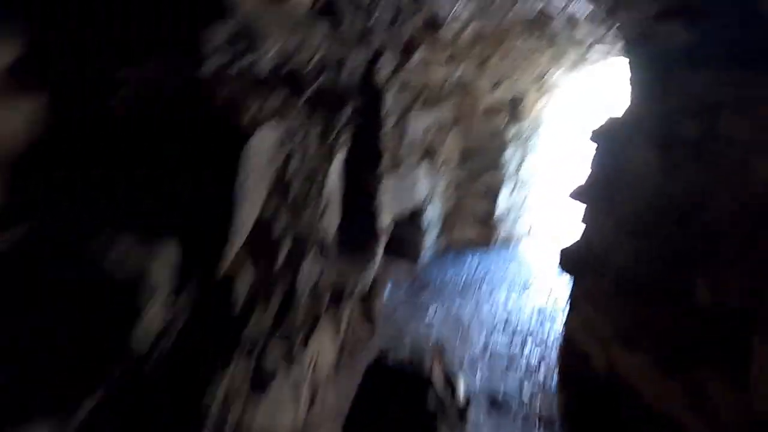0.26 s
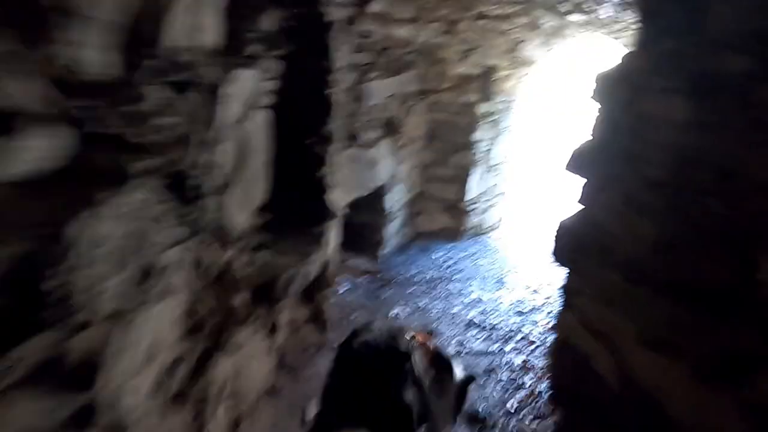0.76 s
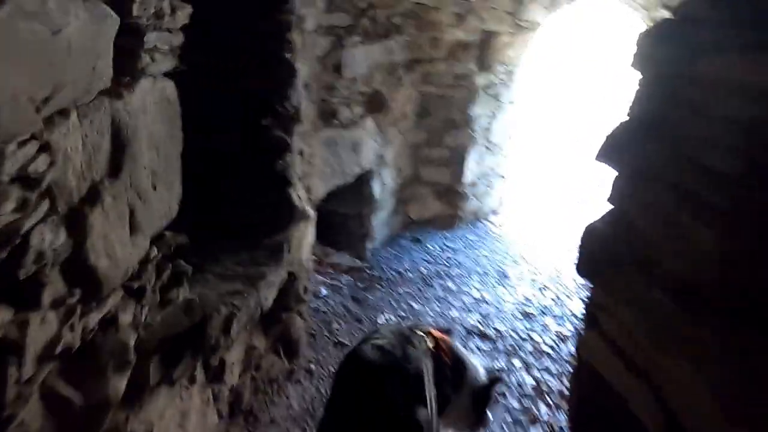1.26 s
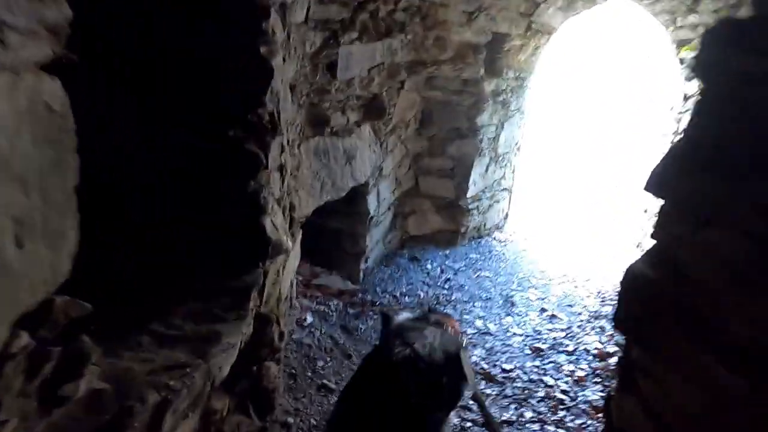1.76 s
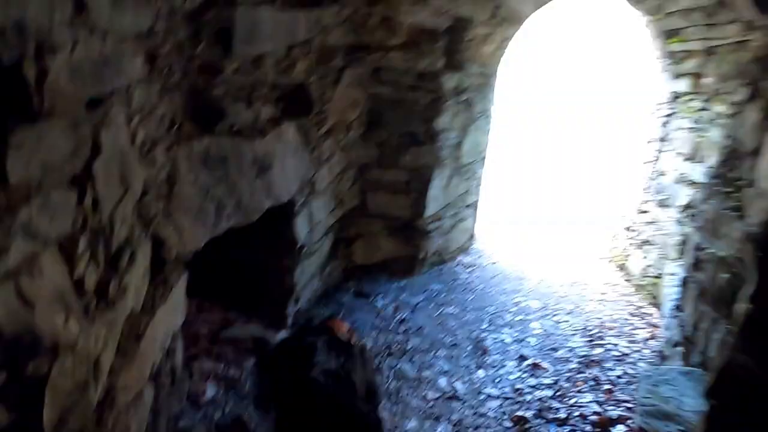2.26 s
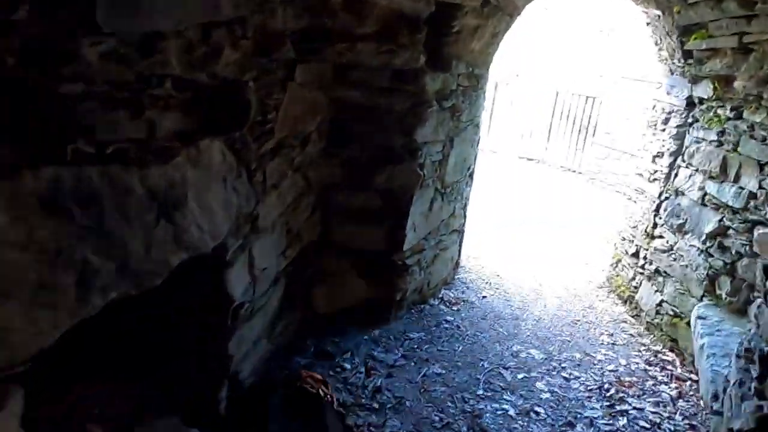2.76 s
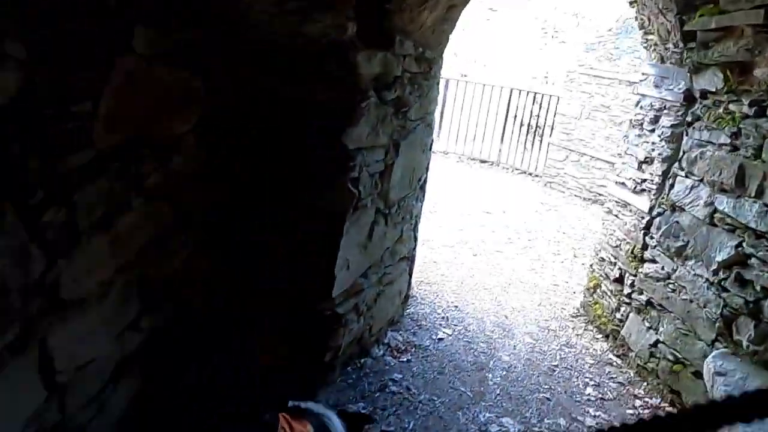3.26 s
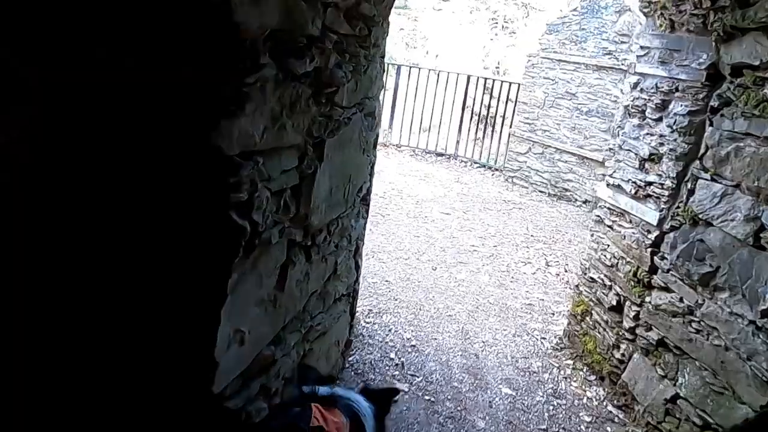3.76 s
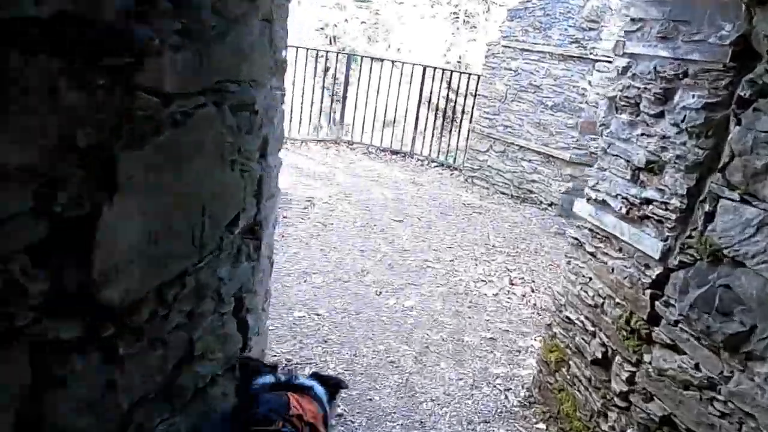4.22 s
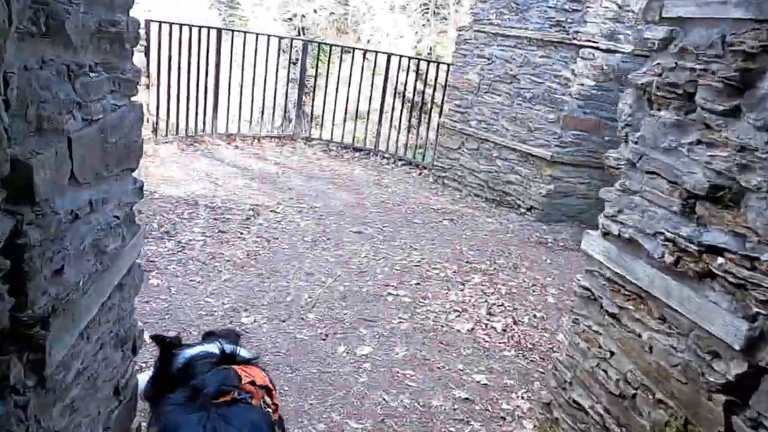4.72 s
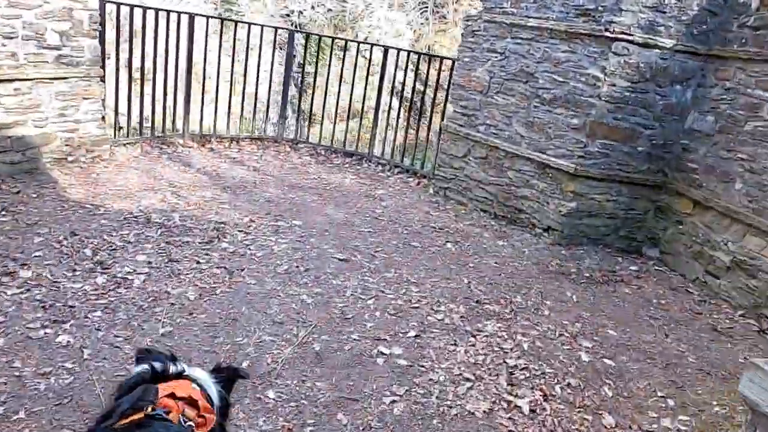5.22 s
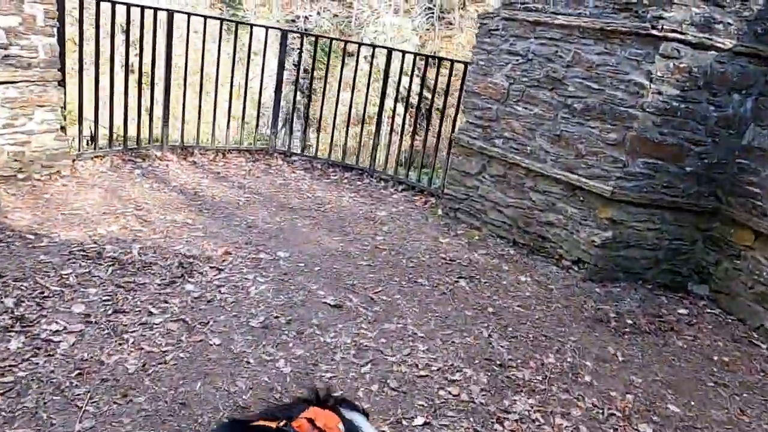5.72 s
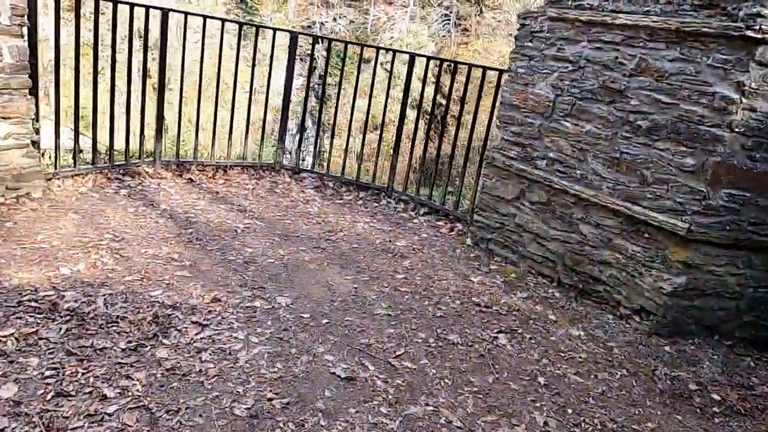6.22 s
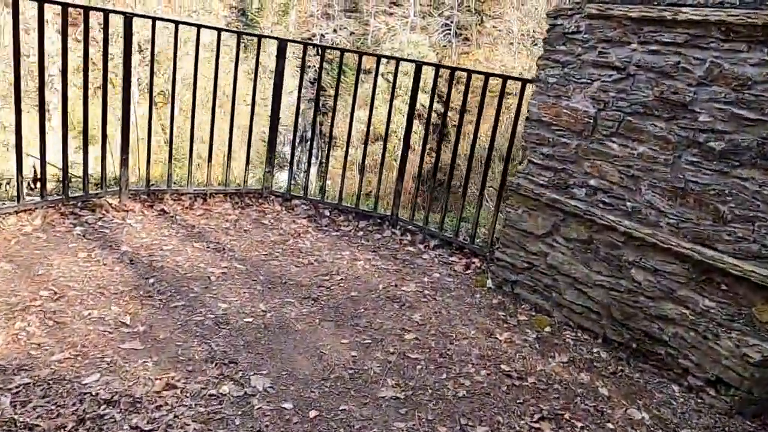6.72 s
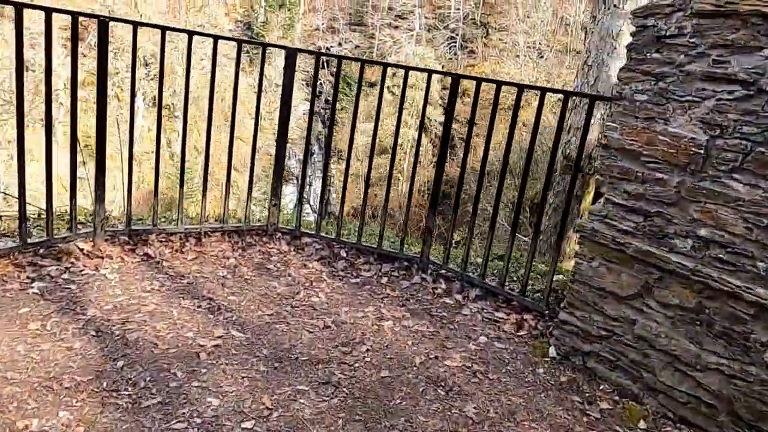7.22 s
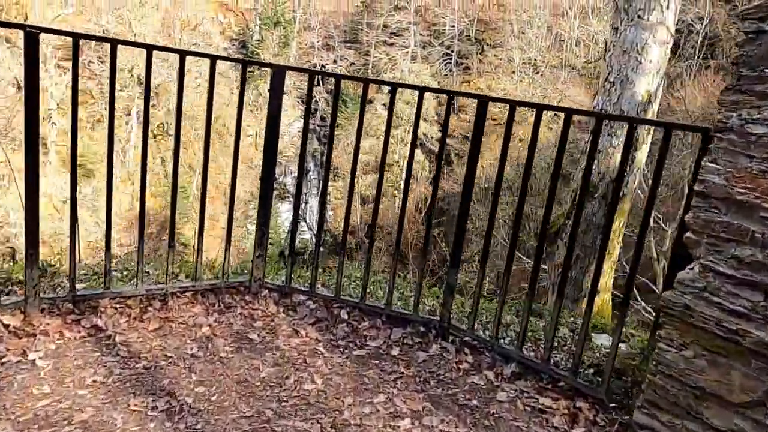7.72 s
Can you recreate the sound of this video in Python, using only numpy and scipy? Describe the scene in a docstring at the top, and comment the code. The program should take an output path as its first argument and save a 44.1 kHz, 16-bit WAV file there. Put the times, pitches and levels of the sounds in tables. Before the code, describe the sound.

Close, uneven footsteps crunch and clack over loose stones and dry leaves in a stone passage, with dull thuds, a scrape and camera rumble.

```python
"""Walker and dog on gravel

A walker with a camera and a dog cross coarse, leafy gravel in a stone passage; the walls ring with each step.
Treads, leaves, cloth and air are shaped noise; stones, heels and chirps are decaying or windowed sines.
A scrape is noise through drifting resonances; jolts of the camera swell as deep rumble and hum."""
import sys
import numpy as np
from scipy import signal
from scipy.fft import rfft, irfft, next_fast_len
from scipy.io import wavfile
from scipy.ndimage import uniform_filter1d

SR = 44100
rng = np.random.default_rng(int(sys.argv[2]) if len(sys.argv) > 2 else 0)


def waveform_to_disk(signal):
    """Save audio, clipped to [-1, 1], as 16-bit WAV at the path in sys.argv[1]."""
    frames = np.transpose(np.atleast_2d(signal))
    scaled = np.clip(frames, -1, 1) * 32767
    samples = np.round(scaled).astype(np.int16)
    wavfile.write(sys.argv[1], SR, samples)


N = 351906

# Spectrum of far wind and microphone hiss: freq_hz, relative_db
AIR = [(12, -24), (30, 1), (90, -17), (170, 3), (400, -1.5), (800, -40), (1150, -4.5), (3400, -1),
       (4400, -5.5), (5400, -30), (7800, -17), (9000, -53), (12800, -36), (15600, -57)]
AIR_DB = -52

# Jolts of the carried camera: peak_s, fall_20db_s, rumble_db, hum_db
JOLTS = [(.03, 0.39, -53, -57), (.24, 0.083, -44, -48.5), (.33, 0.11, -49, -72), (.57, 0.32, -31.5, -34.5),
         (.82, 0.046, -23, -35), (1.11, 0.23, -53, -58.5), (1.26, 0.31, -49, -41.5),
         (1.53, 0.087, -57, -36), (1.64, 0.055, -47, -50.5), (1.95, 0.094, -36, -53),
         (2.3, 0.26, -46, -37.5), (2.4, 0.17, -35.5, -46), (2.55, 0.074, -38.5, -70),
         (2.865, 0.13, -34, -59), (3.4, 0.39, -44.5, -40), (3.6, 0.42, -65, -51.5), (3.915, 0.11, -40, -47),
         (4.04, 0.15, -37, -40), (4.5, 0.31, -47, -49.5), (4.71, 0.27, -47, -58), (5.04, 0.17, -34, -36),
         (5.14, 0.12, -44, -46), (5.22, .08, -48, -68), (5.615, 0.16, -40, -40), (6.11, 0.17, -44, -45),
         (6.68, 0.24, -58.5, -55), (6.85, 0.082, -51, -70), (7.0, 0.053, -49, -83), (7.17, 0.16, -49, -60),
         (7.31, 0.15, -51.5, -50.5), (7.59, .1, -47.5, -75), (7.68, .1, -47, -57), (7.76, .12, -51, -61),
         (7.85, 0.11, -55, -60)]
# Spectrum of the camera's rumble: freq_hz, relative_db
RUMBLE = [(10, -28), (20, 8.5), (40, -8.5), (65, -1), (85, -8), (110, -12), (160, -79)]
# Low modes of ground and passage: freq_hz, width_hz, level_db
GROUND = [(125.4, 22, -3), (165.4, 25.5, 5), (247.5, 14.6, -2.5), (327.6, 82, 4), (407.5, 78, -0.5),
          (528, 210, 0)]
JOLT_RISE, JOLT_BEND = 0.35, 0.73  # rise as a share of the fall; exponent of the dB slope

# Feet and paws pressing gravel, legs brushing: peak_s, fall_20db_s, grind_db, rustle_db
CRUNCHES = [(.09, 0.42, -48.5, -42.5), (.24, 0.11, -48.5, -55), (.53, 0.12, -33.5, -37.5),
            (.66, 0.55, -38, -43), (.805, 0.087, -26.5, -34), (.91, 0.12, -40.5, -50),
            (1.02, 0.046, -41.5, -54), (1.25, 0.16, -34.5, -43.5), (1.31, 0.079, -52, -46),
            (1.484, 0.28, -41.5, -49.5), (1.72, 0.36, -72, -47.5), (1.82, 0.1, -47, -39),
            (1.905, 0.069, -53, -42), (2.065, 0.044, -42, -45.5), (2.305, 0.24, -37, -48.5),
            (2.36, 0.18, -59, -50), (2.86, 0.11, -38, -45), (3.11, 0.25, -51.5, -50),
            (3.31, 0.12, -67, -46), (3.4, 0.093, -33.5, -37), (3.485, 0.031, -58, -41),
            (3.57, 0.45, -52, -47.5), (3.93, 0.15, -37, -41), (4.04, 0.056, -64, -63),
            (4.14, 0.057, -59, -47), (4.21, 0.081, -48, -65), (4.31, 0.054, -42, -49),
            (4.43, 0.13, -48, -55), (4.5, 0.25, -38.5, -44), (4.62, 0.057, -59, -57),
            (4.795, 0.17, -46, -44), (5.04, 0.41, -39.5, -41.5), (5.11, 0.14, -48, -45.5),
            (5.52, 0.18, -36, -45.5), (5.61, 0.079, -30, -41), (5.765, 0.21, -55, -50.5),
            (5.91, 0.3, -42.5, -56), (6.05, 0.16, -38.5, -56), (6.13, 0.044, -43, -49),
            (6.21, 0.11, -69, -49), (6.37, 0.079, -43, -47.5), (6.49, 0.055, -75, -50.5),
            (6.7, 0.21, -48, -49), (7.2, 0.25, -44, -57), (7.6, 0.14, -60, -53.5), (7.77, 0.1, -47, -51.5),
            (7.81, 0.093, -40, -46)]
# Continuous bed of gravel and leaf noise under the steps: time_s, grind_db, rustle_db
BED = [(0, -53.5, -73), (1, -69, -66), (2.2, -57.5, -57), (3.2, -55.5, -63), (4.2, -53, -56),
       (5.3, -53, -64.5), (6.5, -56, -60.5), (8, -58, -59.5)]
# Spectrum of grinding stones: freq_hz, relative_db
GRIND = [(240, -53), (400, -4), (474, -2.5), (748, -5.5), (1300, 2.5), (1440, -1), (1590, -1), (1940, -2),
         (3740, -8.5), (12000, -73), (15600, -62), (22000, -120)]
# Spectrum of leaves and cloth: freq_hz, relative_db
RUSTLE = [(710, -22.5), (1200, -24), (1320, -8), (1380, -18), (1490, -1), (1920, -6), (3500, -2.5),
          (4830, -6.5), (7190, -13), (15600, -45)]
GRIND_RISE, RUSTLE_RISE = 0.4, 0.55  # shares of the fall

# Single stones knocking, grit relative to the stone: start_s, level_db, pitch_hz, grit_db
CLACKS = [(0.148, -32, 1270, -12), (0.519, -24, 1180, -11.5), (0.53, -21, 1160, -11.5),
          (.78, -10.5, 2470, -21), (.791, -16, 1040, -8.5), (0.815, -14.5, 1020, -19.5),
          (1.015, -37, 1410, -6), (1.133, -13, 1740, -22.5), (1.202, -34, 1610, 1), (1.218, -23, 1080, -13),
          (1.232, -33.5, 1110, 3.5), (1.261, -22.5, 1400, -3.5), (1.276, -22, 1410, -25),
          (1.309, -12.5, 1490, -15.5), (1.33, -22, 1510, -28), (1.342, -12.5, 1615, -19),
          (1.385, -25, 1150, -15), (1.482, -22, 1830, -10), (1.635, -20.5, 2420, -26),
          (1.719, -26.5, 3050, -37), (1.771, -35, 1540, -17), (1.806, -27, 2700, -12),
          (1.822, -39.5, 1280, 4.5), (1.89, -17, 3930, -21), (1.908, -25, 1330, -18),
          (1.946, -34.5, 1370, -15), (2.043, -29.5, 1270, -2.5), (2.291, -44, 1870, -19),
          (2.312, -15.5, 1520, -5.5), (2.362, -13.5, 1430, -20), (2.799, -33.5, 1380, -5),
          (2.847, -16, 1210, -15.5), (3.342, -39, 1850, -4), (3.4, -17.5, 1150, -12.5),
          (3.466, -30.5, 970, -7), (3.873, -26.5, 2560, -18), (3.909, -31, 1970, -7),
          (3.924, -19.5, 920, -6.5), (4.301, -26, 1530, -13), (4.399, -43, 1670, -28),
          (4.494, -22.5, 1900, -11.5), (4.508, -27.5, 1304, -7.5), (4.56, -32, 1640, -20),
          (4.601, -31, 1320, -29), (4.779, -24.5, 3340, -8), (5.005, -27, 3000, 0),
          (5.018, -30.5, 1600, -2), (5.035, -18, 1300, -11), (5.051, -16.5, 1150, -16.5),
          (5.074, -21, 1090, -18.5), (5.19, -23, 1680, -13), (5.402, -36, 1730, -12),
          (5.457, -28, 1980, -18), (5.48, -31.5, 1710, -28), (5.496, -21, 2600, -31),
          (5.526, -21, 2110, -14.5), (5.562, -12, 1320, -10.5), (5.662, -29.5, 1460, -15),
          (5.69, -35, 1200, -21), (5.908, -21.5, 1290, -15.5), (5.977, -27.5, 1610, -25),
          (5.993, -33, 1100, -14), (6.036, -23, 1930, -9), (6.075, -15, 1460, -18.5),
          (6.114, -28, 940, -13), (6.303, -34.5, 1580, -12), (6.488, -31, 2350, -33),
          (6.59, -31, 2500, -21), (6.611, -36, 2060, -13), (6.637, -27.5, 1960, -19),
          (7.141, -30.5, 1660, -8), (7.189, -39, 1570, -6), (7.758, -31, 2070, -30),
          (7.777, -29, 2040, -15.5)]
EDGE_DB, EDGE_SLOPE = -15.5, -0.4  # bright edge at level_db -25; louder stones are duller
GRIT_T60_S = 0.14

# Heels and paws landing, boom relative to the thud: start_s, level_db, pitch_hz, boom_db, boom_t60_s
THUDS = [(0.53, -11.5, 246, -6, .13), (0.601, -18.5, 114, -14, 0.19), (0.659, -21, 169, -32, 0.18),
         (.793, -15.5, 278, 0, 0.098), (0.827, -28.5, 64, 2, 0.46), (1.211, -28, 166, -7, 0.16),
         (1.514, -23.5, 194, -12, 0.13), (1.807, -28, 158, -10, 0.43), (1.899, -40, 183, -3.5, 0.29),
         (2.046, -46.5, 526, 3.5, 0.21), (2.313, -22.5, 546, -8.5, 0.39), (2.673, -41.5, 565, 2, 0.12),
         (2.8, -25, 157, -6, 0.64), (2.846, -16.5, 332, -4.5, 0.16), (2.87, -19, 84, -20, 0.49),
         (3.391, -19, 168, -4, 0.26), (3.874, -31, 161, -5.5, 0.76), (3.924, -4.5, 316, -6.5, 0.16),
         (3.991, -23, 302, -5, 0.098), (4.435, -45, 171, 2.5, 0.73), (4.494, -29, 173, -11, 0.29),
         (4.78, -48, 400, 7.5, 0.23), (4.991, -31, 200, -6, 0.13), (5.031, -21.5, 69, 2.5, 0.18),
         (5.197, -23.5, 214, 1.5, 0.04), (5.553, -24.5, 182, -5, 0.14), (5.595, -16, 220, -15.5, .22),
         (5.904, -40, 490, 5.5, 0.17), (6.067, -32, 230, -8, 0.16), (6.599, -38, 190, -7, .15),
         (6.658, -32.5, 185, -6.5, 0.21), (6.844, -38, 100, -9, 0.059), (6.95, -37, 89, -2.5, .1),
         (7.012, -37, 98, -11, 0.06), (7.136, -27, 156, -12, 0.1), (7.188, -17.5, 210, -14, 0.25),
         (7.579, -41, 99, -9, 0.091), (7.651, -37.5, 93, -4, 0.11), (7.743, -32, 97, -12.5, 0.36),
         (7.801, -30.5, 313, -10, 0.25)]
SWING_T60_CYCLES = 8.1

# Stone dragged over a slab: time_s, level_db, ring_hz
SCRAPE = [(.56, -39, 4150), (.61, -32.5, 3590), (.65, -33, 3400), (.69, -28, 3396), (.735, -34, 3430),
          (.78, -29, 3580), (.83, -40, 3500), (.875, -37.5, 3550), (.93, -49, 3700)]
# Resonances of the dragged stone: factor_on_ring, width_hz, level_db
STRANDS = [(0.173, 149, -7), (.28, 200, -6.5), (.96, 150, -5), (1, 150, 4), (1.12, 200, -6),
           (1.27, 300, -8.5)]

# Dry leaves snapping: start_s, level_db
SNAPS = [(.655, -54), (1.276, -46), (1.479, -47), (1.619, -45), (1.638, -40.5), (1.703, -36.5),
         (1.784, -43), (1.891, -41), (1.947, -40), (2.312, -37), (3.378, -50), (3.403, -48), (3.561, -47),
         (3.924, -45), (4.034, -43), (4.403, -47), (4.781, -47), (5.031, -53), (6.036, -51), (6.077, -47),
         (6.206, -47), (7.684, -49)]
SNAP_HZ, SNAP_SPAN = 6100, 0.12  # span of pitch as a share of SNAP_HZ
# Small bright chirps, perhaps a tag on the harness: start_s, peak_db, pitch_hz, length_s
CHIRPS = [(3.69, -53, 8250, 0.023), (4.427, -53, 8140, 0.018), (4.46, -50, 5920, 0.031),
          (6.204, -81, 5660, 0.0042)]

# Cloth brushing close to the camera: time_s, level_db
BRUSH = [(2.4, -62), (2.55, -50), (2.66, -43), (2.78, -45), (2.86, -43.5), (2.92, -58), (2.97, -79)]
# Spectrum of the brushed cloth: freq_hz, relative_db
CLOTH = [(470, -45), (800, -20), (952, -3.5), (1200, -8), (1310, -11), (1950, 0), (3500, -0.5), (4830, -8),
         (7180, -8.5), (15500, -39)]

# Decay of the passage: freq_hz, t60_s
STONE = [(60, 0.2), (200, 0.27), (500, 0.29), (1500, 0.067), (4000, 0.16), (10000, 0.055)]
WALLS_DB = -10.5  # wall ring relative to direct sound

# Left-right likeness: freq_hz, likeness_0_to_1
SAME = [(30, .88), (100, .96), (300, .98), (800, .95), (2000, .94), (3000, .9), (4500, .72), (7000, .3),
        (15000, .3)]
# Left port over right: freq_hz, tilt_db
TILT = [(30, 1.5), (300, 0.8), (1000, 1.3), (2500, 1.5), (4500, 5.5), (6000, -7), (8000, -18.5),
        (10000, -13.5), (13000, -8)]
LAG_S = 0.000072  # left port behind right
BAND_LIMIT_HZ = 15700


def amp(db):
    """Gain of a level in dB."""
    return 10 ** (np.asarray(db) / 20)


def evened(x):
    """Scaled to rms 1."""
    return x / np.sqrt(np.mean(x ** 2) + 1e-20)


def read(points, hz):
    """A table interpolated over log frequency."""
    f, value = np.transpose(points)
    return np.interp(np.log(hz + 1), np.log(f + 1), value)


def curve(rows, count):
    """One column of a table over time, for every sample."""
    rows = np.array(rows)
    return np.interp(np.arange(N) / SR, rows[:, 0], rows[:, count])


def swells(rows, count, rise, bend):
    """Gain of one column of events: each rises to its peak and sinks 20 dB over its fall; powers add."""
    rows, t = np.array(rows), np.arange(0, N + 64, 64) / SR
    u = (t - rows[:, :1]) / np.maximum(rows[:, 1:2], 0.01)
    drop_db = 20 * np.where(u < 0, -u / rise, u) ** bend
    power = amp(rows[:, count, None] - drop_db) ** 2
    return np.interp(np.arange(N) / SR, t, np.sqrt(power.sum(0)))


def add(mix, start_s, sound):
    """Mixes a sound in at a time."""
    part = mix[round(start_s * SR):][:len(sound)]
    part += sound[:len(part)]


def coloured(x, points):
    """Causal minimum-phase filter with the given spectrum, output rms 1."""
    level_db = np.maximum(read(points, abs(np.fft.fftfreq(8192, 1 / SR))), -100)
    log_gain = np.log(amp(level_db))
    taps = np.fft.ifft(np.exp(np.conj(signal.hilbert(log_gain)))).real[:4096]
    return evened(signal.oaconvolve(x, taps)[:N])


def resonate(x, hz, width_hz):
    """Shifts hz down to zero, smooths twice and shifts back: a steep resonance, output rms 1."""
    turn = np.exp(2j * np.pi * np.cumsum(hz * np.ones(len(x))) / SR)
    r = np.exp(-np.pi * width_hz / SR)
    smooth = signal.lfilter([1], [1, -2 * r, r * r], x / turn)
    return evened((turn * smooth).real)


def grains(per_s, spread_db, haze):
    """Random clicks of exponentially spread dB level and random sign, over a haze of white noise."""
    size = amp(spread_db * np.minimum(rng.exponential(1, N), 4)) * rng.choice([-1, 1], N)
    clicks = evened(size * (rng.random(N) < per_s / SR))
    return clicks + haze * rng.standard_normal(N)


def pebbles(per_s, spread_db):
    """Random knocks of pebbles of many sizes, each size with its own short ring."""
    out, t = np.zeros(N), np.arange(300) / SR
    for hz in np.geomspace(600, 7000, num=12):
        ring = np.exp(-t * hz * 1.18) * np.sin(2 * np.pi * hz * t)
        ring = ring / np.linalg.norm(ring) * np.sqrt(hz)
        out += signal.oaconvolve(grains(per_s / 12, spread_db, 0), ring)[:N]
    return evened(out)


def air():
    """Far wind in trees and microphone hiss: shaped noise in drifting patches."""
    frames, hz = N // 512 + 5, np.fft.rfftfreq(2048, 1 / SR)
    real, imag, patches = rng.standard_normal((frames, 1025, 3)).T
    patches = uniform_filter1d(patches, 28, 0)  # over frequency
    patches = evened(uniform_filter1d(patches, 6, 1))  # over time
    z = (real + 1j * imag) * amp(read(AIR, hz)[:, None] + 1.5 * patches)
    noise = signal.istft(z, nperseg=2048, noverlap=1536)[1][:N]
    return amp(AIR_DB) * evened(noise)


def low_modes():
    """Shaken ground, ringing in its low modes."""
    shake = grains(per_s=350, spread_db=4.0, haze=0.65)
    return evened(sum(amp(db) * resonate(shake, hz, width_hz) for hz, width_hz, db in GROUND))


def sway():
    """Jolts of the carried camera: deep noise rumble over the faint hum of ground and passage."""
    rumble = coloured(rng.standard_normal(N), RUMBLE)
    rumble = rumble * swells(JOLTS, count=2, rise=JOLT_RISE, bend=JOLT_BEND)
    return rumble + low_modes() * swells(JOLTS, count=3, rise=JOLT_RISE, bend=JOLT_BEND)


def tread():
    """Stones grind and leaves rustle as weight rolls over each foot, above a continuous bed of both."""
    stones = pebbles(per_s=2500, spread_db=1.5) + 0.68 * rng.standard_normal(N)
    press = swells(CRUNCHES, count=2, rise=GRIND_RISE, bend=1.02)
    grind = coloured(stones, GRIND) * np.hypot(press, amp(curve(BED, count=1)))
    leaves = coloured(grains(per_s=3700, spread_db=-1.5, haze=0.72), RUSTLE)
    stir = swells(CRUNCHES, count=3, rise=RUSTLE_RISE, bend=0.83)
    return grind + leaves * np.hypot(stir, amp(curve(BED, count=2)))


def clacks():
    """Each stone rings a few cycles with a bright edge, knocks a neighbour and sends grit rattling."""
    out, t = np.zeros(N), np.arange(6000) / SR
    grit = coloured(pebbles(per_s=2200, spread_db=4.0) + 0.42 * rng.standard_normal(N), GRIND)
    for (s, db, hz, grit_db), (gap, shift) in zip(CLACKS, rng.random((len(CLACKS), 2))):
        edge_db = EDGE_DB + EDGE_SLOPE * (db + 25)
        fade = np.exp(-t * hz * 0.75) * (1 - np.exp(-t / 0.0002))
        edge = sum(np.sin(2 * np.pi * k * hz * t) / k for k in (1.45, 2.1, 3.1)) * np.exp(-t / 0.001)
        knock = 2 * fade * (np.sin(2 * np.pi * hz * t) + 2 * amp(edge_db) * edge)
        rattle_gain = amp(grit_db - 60 * t / GRIT_T60_S) * (1 - np.exp(-t / 0.001))
        rattle = np.resize(grit[round(s * SR):], len(t)) * rattle_gain
        add(out, s, amp(db) * (knock + rattle))
        neighbour_hz = (0.75 + 0.3 * shift) * hz
        neighbour = amp(db - 3) * fade * np.sin(2 * np.pi * neighbour_hz * t)
        add(out, s + 0.002 + 0.007 * gap, neighbour)
    return signal.sosfilt(signal.butter(2, 5500, fs=SR, output="sos"), out)  # softens the top of the clacks


def thuds():
    """A heel's short swing sinks to its pitch while the ground booms around it and in its own low modes."""
    out, t, ground = np.zeros(N), np.arange(16000) / SR, low_modes()
    for (s, db, hz, boom_db, t60_s), shake in zip(THUDS, rng.standard_normal((len(THUDS), 16000))):
        turns = np.cumsum(hz * (1 + 0.6 * np.exp(-t / 0.0023))) / SR
        swing_gain = amp(-60 * t * hz / SWING_T60_CYCLES) * (1 - np.exp(-t / 0.0054))
        swing = swing_gain * np.sin(2 * np.pi * turns)
        boom = 0.82 * resonate(shake, hz, 0.47 * hz) + 0.55 * np.resize(ground[round(s * SR):], len(t))
        boom_gain = amp(boom_db - 60 * t / max(t60_s, 0.02)) * (1 - np.exp(-t / 0.0011))
        add(out, s, amp(db) * (swing + boom_gain * boom))
    return out


def scrape():
    """Friction noise rings the drifting resonances of the dragged stone."""
    drag, ring_hz = rng.standard_normal(N), curve(SCRAPE, count=2)
    out = sum(amp(db) * resonate(drag, factor * ring_hz, width_hz) for factor, width_hz, db in STRANDS)
    t = np.arange(N) / SR
    contact = np.clip(np.minimum(t - SCRAPE[0][0], SCRAPE[-1][0] - t) / 0.0082, 0, 1)
    return evened(out) * contact * amp(curve(SCRAPE, count=1))


def snaps():
    """Each leaf breaks in a tiny bright crack of resonant noise."""
    out, t = np.zeros(N), np.arange(400) / SR
    for (s, db), crack in zip(SNAPS, rng.standard_normal((len(SNAPS), 400))):
        hz = SNAP_HZ * (1 + SNAP_SPAN * np.tanh(crack[0]) / 2)
        fade = np.exp(-t / 0.003) * (1 - np.exp(-t / 0.0004))
        add(out, s, amp(db) * fade * resonate(crack, hz, 0.3 * hz))
    return out


def brush():
    """A leg or the lead sweeps over cloth: one long, bright swish of noise."""
    t = np.arange(N) / SR
    touching = (t > BRUSH[0][0]) & (t < BRUSH[-1][0])
    cloth = coloured(grains(per_s=4000, spread_db=-2.5, haze=2.3), CLOTH)
    return cloth * amp(curve(BRUSH, count=1)) * touching


def chirps():
    """Thin sine chirps of steady pitch, each swelling and fading."""
    out = np.zeros(N)
    for s, db, hz, length_s in CHIRPS:
        t = np.arange(0, length_s, 1 / SR)
        add(out, s, amp(db) * np.hanning(len(t)) * np.sin(2 * np.pi * hz * t))
    return out


def echoes():
    """Sparse taps of random sign, each band dying at the speed of the stone walls; energy 1."""
    taps = np.zeros(SR // 2)
    at = np.arange(120, SR // 2 - 20, 20)
    taps[at + rng.integers(0, 20, len(at))] = rng.choice([-1., 1.], len(at))
    hz, t, z = signal.stft(taps, SR, nperseg=256)
    z = z * amp(-60 * t / read(STONE, hz)[:, None])
    z = z / np.sqrt((abs(z) ** 2).sum(1))[:, None]  # equal energy in every band
    tail = signal.istft(z, SR, nperseg=256)[1]
    return tail / np.linalg.norm(tail)


def passage(x):
    """Direct sound plus wall ring, fed in turn to three echo tails as the walker moves."""
    turn = np.pi * 1.3 * np.arange(N) / SR
    fed = x * amp(WALLS_DB) * np.sqrt(2 / 3)  # the three squared cosines sum to 3/2
    return x + sum(signal.oaconvolve(fed * np.cos(turn + k * np.pi / 3), echoes())[:N] for k in range(3))


def scatter(x, size):
    """The same sound with every short-time frequency bin turned by a random phase."""
    overlap = size * 3 // 4
    z = signal.stft(x, nperseg=size, noverlap=overlap)[2]
    z = z * np.exp(2j * np.pi * rng.random(z.T.shape).T)
    y = signal.istft(z, nperseg=size, noverlap=overlap)[1][:N]
    return y * np.std(x) / np.std(y)


def scene():
    """Two close microphone ports: much alike in the bass, left lagging, scattered in the treble."""
    steps = tread() + clacks() + thuds() + scrape() + snaps() + brush() + chirps()
    near = passage(steps) + sway() + air()
    size = next_fast_len(N + SR)
    hz = np.fft.rfftfreq(size, 1 / SR)
    right = rfft(near, size)
    long_grains = rfft(scatter(near, size=2048), size)
    short_grains = rfft(scatter(near, size=128), size)
    other = np.where(hz < 500, long_grains, short_grains)
    same, tilt = np.clip(read(SAME, hz), 0, 1), amp(read(TILT, hz))
    lag = np.exp(-2j * np.pi * hz * LAG_S)
    left = tilt * (same * lag * right + np.sqrt(1 - same ** 2) * other)
    both = np.sqrt(1 + tilt ** 2 + 2 * tilt * same * lag.real) / 2  # keeps the sum of the ports flat
    return irfft(np.array([left, right]) / both, size)[:, :N]


def record(dry):
    """The recorder's band limit: a steep low-pass."""
    taps = signal.firwin(511, BAND_LIMIT_HZ, window=("kaiser", 9), fs=SR)
    return signal.oaconvolve(dry, taps[None], "same")


dry = scene()
out = record(dry)
waveform_to_disk(out)
```